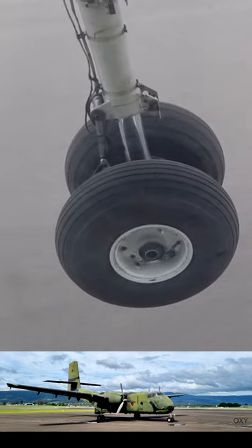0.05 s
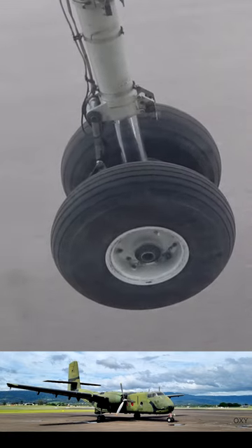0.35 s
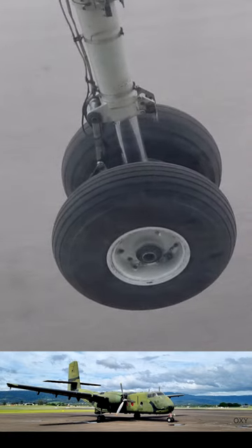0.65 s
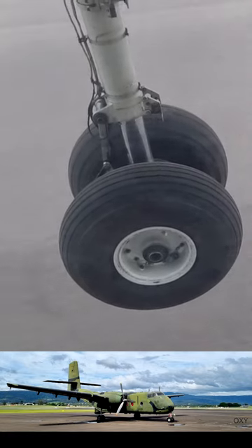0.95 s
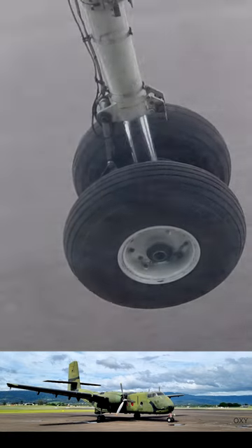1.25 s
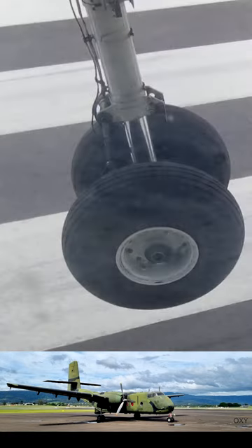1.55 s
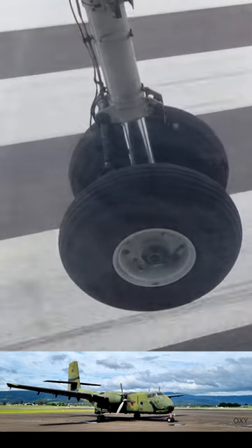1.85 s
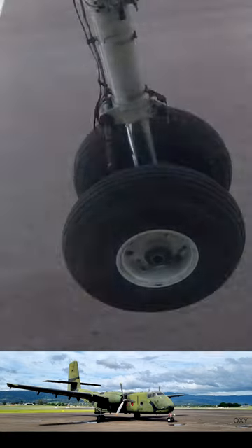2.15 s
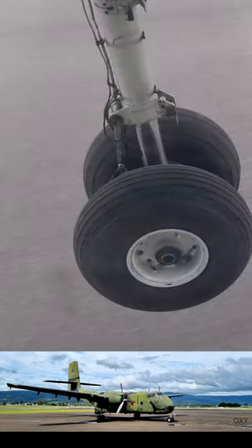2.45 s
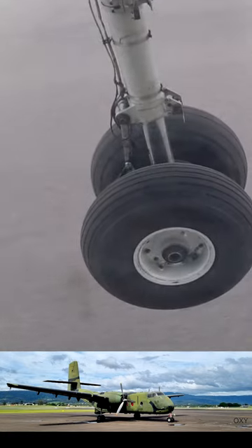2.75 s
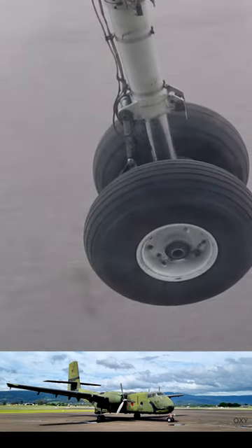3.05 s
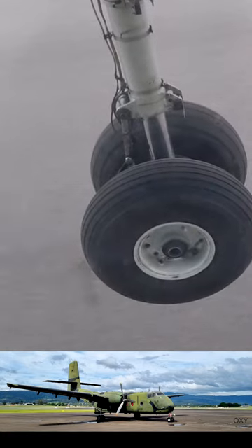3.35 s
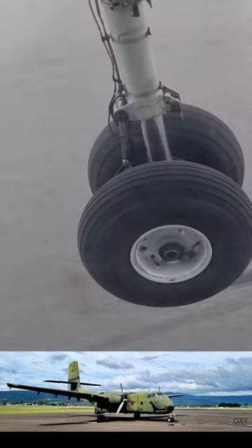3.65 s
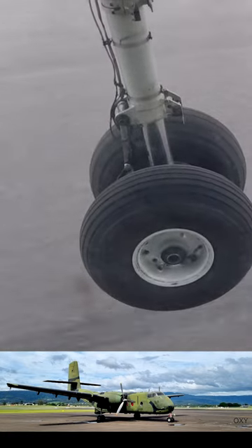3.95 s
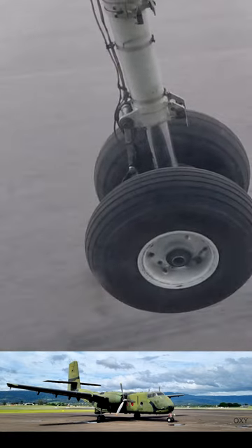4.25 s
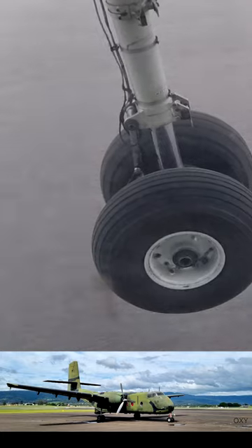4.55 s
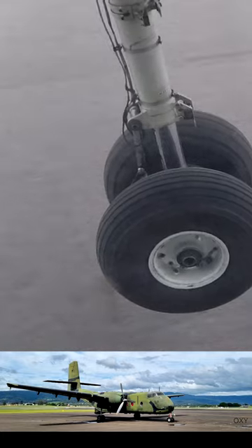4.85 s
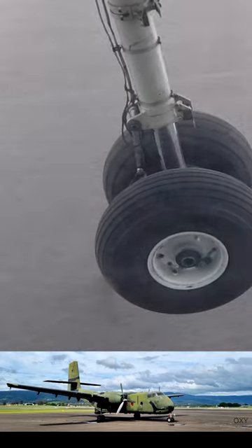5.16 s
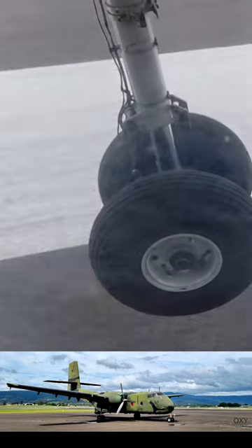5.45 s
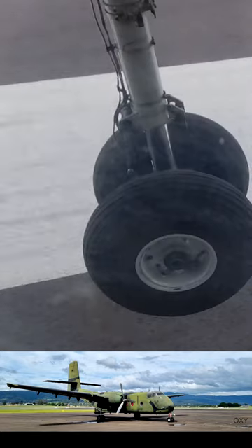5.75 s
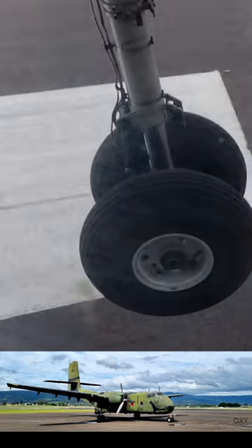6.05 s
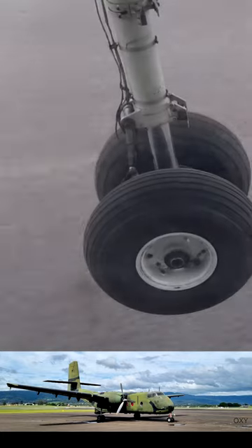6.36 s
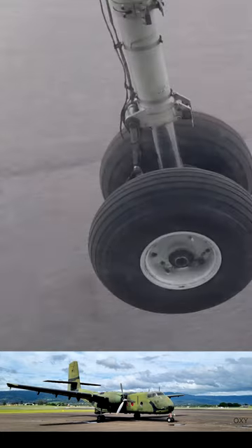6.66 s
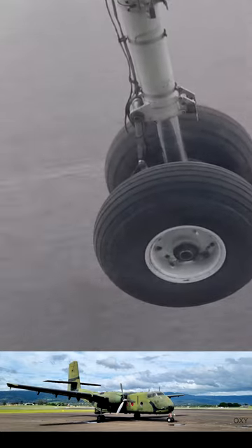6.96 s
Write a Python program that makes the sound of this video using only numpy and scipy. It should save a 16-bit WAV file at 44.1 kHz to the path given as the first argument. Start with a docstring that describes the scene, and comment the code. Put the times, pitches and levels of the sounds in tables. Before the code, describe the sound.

Inside a landing propeller plane, a low piston engine hum winds down and burbles while airflow roars and hisses past the window.

```python
"""Cabin of a piston transport aircraft, gliding over the runway just before touchdown.
The radial engine and three-bladed propeller wind down; their harmonics throb, then even out to a drone.
Propeller wash rumbles on the hull; the slipstream roars, hisses and whistles at the window.
The exhaust burbles as the throttle closes, and panels sing as high harmonics glide through them."""
import sys
import numpy as np
from scipy import signal
from scipy.fft import rfft, irfft, next_fast_len
from scipy.io import wavfile
from scipy.ndimage import map_coordinates

SR = 44100
rng = np.random.default_rng(int(sys.argv[2]) if len(sys.argv) > 2 else 0)


def put_to_file(sound):
    """Save the sound as 16-bit audio at rate SR, in the file named by the first command-line argument."""
    columns = np.atleast_2d(sound).T  # one column per channel
    safe = np.clip(columns, -1, 1)
    whole_steps = np.round(safe * 32767)
    wavfile.write(sys.argv[1], SR, whole_steps.astype(np.int16))


N = 309141

# working-cycle rate (1 cycle = 2 crank turns = 1 propeller turn): t/s, f/Hz
CYCLE_RATE = [(0.0, 17.146), (0.92, 17.11), (1.7, 16.369), (2.55, 15.623), (3.6, 15.118), (5.38, 14.544),
              (6.0, 13.628), (7.0, 12.559)]
# spread of each cycle's thump: t/s, smear (0 = throb, 1 = even drone)
THUMP_SMEAR = [(0, .65), (.8, .65), (1.6, .25), (2.3, .25), (2.9, .95), (7, 1)]
# leading tones, blade order 6 and exhaust order 10: t/s, level/dB
BLADE_LEVEL = [(0, -22.5), (1.15, -14), (1.8, -17.5), (2.4, -24.5), (3.15, -21), (3.9, -24.5), (4.5, -18.5),
               (5.3, -21), (6.1, -29.5), (7, -23.5)]
EXHAUST_LEVEL = [(0, -19), (1.7, -23), (2.1, -32), (2.6, -21.5), (3.3, -22), (4.1, -27), (4.6, -29),
                 (5.7, -37), (7, -43)]
# other harmonics at 15 Hz (multiples of 3: blades, rest: exhaust): order, level/dB
DRONE_ORDERS = [(3, -34.5), (4, -31.5), (5, -26.3), (7, -45), (9, -37.5), (11, -42.5), (12, -37.5),
                (13, -45), (14, -39), (15, -47.5), (17, -41), (18, -41), (20, -46), (21, -43), (22, -46.5),
                (23, -44), (24, -43), (27, -44)]
# cabin standing waves: f/Hz, width/Hz, peak or dip/dB
CABIN_MODES = [(41, 35, 9.5), (41.7, 2.4, 6), (47.3, 1.2, 7), (49, 1.3, -9), (72.45, 2.2, 5.5),
               (76.4, 8, 5.5), (83.5, 4.5, -15.5), (88.7, 4.7, 6), (97, 9.5, 7.5), (138, 6.6, 5.5),
               (154.8, 6.5, 8.5), (162.6, 4.6, 8.5), (172.9, 14.8, 12.5), (269, 7.7, 8), (322.1, 14, 13.5)]
# airflow along the hull: t/s, level/dB
FLOW_LEVEL = [(0, 1), (.72, 0.7), (1.05, -1.7), (1.7, -2), (2.35, 0.3), (3.0, 0.1), (3.9, 1.4), (5.6, -0.5),
              (7, 2.5)]
# air noise spectra, relative density: f/Hz, level/dB
WASH_SPECTRUM = [(18, -15), (30, 1.5), (70, 1), (125, -2), (190, 1.5), (225, -1.5), (320, -0.5), (390, -5),
                 (470, -11.5), (650, -26.5), (1500, -58)]
ROAR_MID_SPECTRUM = [(200, -15), (450, 7), (560, 5), (700, 3), (850, 1), (1050, -3.5), (1250, -5),
                     (1500, -13), (2000, -14.5), (4000, -32.5)]
ROAR_SIDE_SPECTRUM = [(50, 8), (100, -2.5), (230, -9.5), (390, -5), (520, 1.5), (610, -2.5), (800, -3.5),
                      (1050, -9), (1270, -7.5), (1470, -17.5), (1650, -15), (1950, -20), (2300, -20),
                      (4000, -27)]
HISS_LEFT_SPECTRUM = [(800, 7), (1900, -1), (2700, 4.5), (3100, 1), (3600, 0.5), (5200, -1), (6400, 0.5),
                      (8400, 1.5), (10300, -2.5), (13500, -1.5), (15700, -3)]
HISS_RIGHT_SPECTRUM = [(800, 12), (1900, 5.5), (2700, 8), (4000, 6.5), (5800, 5), (9000, 0), (10200, -3.5),
                       (11200, -8), (12600, 2.5), (13700, 1.5), (15700, -5)]
WHISTLE_SPECTRUM = [(1900, -39), (2490, -5), (2600, 1), (2710, -3), (2850, -5), (3200, -9.5), (4000, -27),
                    (4700, -6.5), (5700, -26), (6300, -9), (7200, -37)]
# top band of the hiss, relative: t/s, level/dB
TOP_HISS_LEVEL = [(0, -38), (.7, -38), (1.2, -40.5), (4.4, -40), (5.7, -43.5), (7, -43)]
# exhaust thump spectrum, relative density: f/Hz, level/dB
BURBLE_SPECTRUM = [(15, -28), (28, -27), (42, 2), (70, -4.5), (92, 4.5), (115, -3), (170, -8), (220, -17),
                   (310, -9), (400, -30), (600, -76)]
# panel resonances: f/Hz, width/Hz, level/dB
PANEL_MODES = [(470, 40, -44), (600, 60, -50), (828, 40, -40), (960, 40, -48), (1060, 50, -50),
               (1180, 36, -49)]
# engine's drive on the panels: t/s, level/dB
SHAKE_LEVEL = [(0, -26), (1.8, -12), (2.9, -4.5), (3.2, 3), (3.5, 0.5), (3.78, 5.5), (4.95, -1.5),
               (5.3, -0.5), (5.75, -6), (7, -3)]


def undb(db):
    return 10 ** (np.asarray(db) / 20)


def curve(table):
    """Time table, linearly interpolated per sample."""
    t_s, values = np.transpose(table)
    return np.interp(np.arange(N) / SR, t_s, values)


def walk(rate_hz):
    """Smooth random drift, spread near 1."""
    knots = rng.standard_normal(int(rate_hz * N / SR) + 4)
    grid = np.arange(0, N + 64, 64)
    spline = map_coordinates(knots, [1 + grid * rate_hz / SR], order=3, mode="nearest")
    return np.interp(np.arange(N), grid, spline)


def colour(x, spectrum):
    """Shape x to a spectrum, rolled off past its ends; rms 1."""
    f_hz, level_db = np.transpose(spectrum)
    size = next_fast_len(N)
    bins_hz = np.maximum(np.arange(size // 2 + 1) * SR / size, 1)
    gain = undb(np.interp(np.log(bins_hz), np.log(f_hz), level_db))
    skirts = np.minimum(bins_hz / f_hz[0], 1) ** 2 * np.minimum(f_hz[-1] / bins_hz, 1) ** 2
    shaped = irfft(rfft(x, size) * gain * skirts, size)[:N]
    return shaped / np.std(shaped)


def noise(spectrum):
    return colour(rng.standard_normal(N), spectrum)


def resonance(f_hz, centre_hz, width_hz):
    """Bell curve, peak 1."""
    return 1 / (1 + (2 * (f_hz - centre_hz) / width_hz) ** 2)


def standing_waves_db(f_hz, hop=100):
    """Cabin boost or cut of a gliding tone."""
    gain_db = sum(db * resonance(f_hz[::hop], hz, width_hz) for hz, width_hz, db in CABIN_MODES)
    return np.interp(np.arange(N), np.arange(0, N, hop), gain_db)


def harmonic(prop_rad, order, smear, waver_db=.5):
    """One tone, rms near 1. Smear drifts its phase and offsets the order above each blade harmonic."""
    offset_rad = np.pi * (order % 3 == 1) + .05 * order * walk(.7)
    return np.sqrt(2) * undb(waver_db * walk(2.5)) * np.sin(order * prop_rad + smear * offset_rad)


def engine_drone(prop_rad, cycle_hz):
    """Blade and exhaust harmonics align once a cycle in a throb; smear evens it out."""
    reference_hz, db_per_octave = 15, 13.5
    effort_db = db_per_octave * np.log2(cycle_hz / reference_hz)
    smear = curve(THUMP_SMEAR)
    drone = undb(curve(BLADE_LEVEL)) * harmonic(prop_rad, 6, smear)
    drone += undb(curve(EXHAUST_LEVEL)) * harmonic(prop_rad, 10, smear)
    for order, level_db in DRONE_ORDERS:
        if order in (3, 4, 5, 7, 9, 12):
            tone = harmonic(prop_rad, order, smear)
        else:  # upper orders bounce round the cabin, never align
            tone = harmonic(prop_rad, order, smear=1.7, waver_db=1.5)
        drone += undb(level_db + effort_db + standing_waves_db(order * cycle_hz)) * tone
    return drone


def propeller_wash(prop_rad, flow_db):
    """Wash rumbles on the hull, pulsing per blade and per turn."""
    pulse = 1 + .2 * np.cos(3 * prop_rad) + .2 * np.cos(prop_rad)
    return noise(WASH_SPECTRUM) * pulse * undb(-21.5 + .96 * flow_db)


def slipstream_roar(flow_db):
    """Air roars past; near the glass, left and right are mostly in antiphase."""
    mid = noise(ROAR_MID_SPECTRUM) * undb(-33 + flow_db + .5 * walk(7))
    side = noise(ROAR_SIDE_SPECTRUM) * undb(-26.5 + flow_db + .5 * walk(6.3))
    return np.array([mid + undb(1.2) * side, mid - side])


def slipstream_hiss(flow_db, split_hz=6200):
    """Air hisses along the window, louder on the right; the lower band follows the flow."""
    hiss = np.array([noise(HISS_LEFT_SPECTRUM) * undb(-.9), noise(HISS_RIGHT_SPECTRUM) * undb(5)])
    top = signal.sosfiltfilt(signal.butter(2, split_hz, "high", fs=SR, output="sos"), hiss)
    return (hiss - top) * undb(-38 + .81 * flow_db) + top * undb(curve(TOP_HISS_LEVEL) + 5)


def window_whistle(flow_db, rise_db_per_s=.5):
    """A window gap whistles breathily, slowly growing."""
    rise_db = rise_db_per_s * np.arange(N) / SR
    return noise(WHISTLE_SPECTRUM) * undb(-48.5 + .8 * flow_db + rise_db + 1.3 * walk(6))


def exhaust_burble(prop_rad, cycle_hz, cylinders=14):
    """Cylinders fire in turn at random strength; burning grows uneven towards idle."""
    power_db, idle_db = -35, -19
    onset_hz, spread_hz = 15.27, .9
    firings = np.diff(np.floor(cylinders * prop_rad / (2 * np.pi)), prepend=0)
    thumps = colour(firings * rng.standard_normal(N), BURBLE_SPECTRUM)
    idling = 1 / (1 + np.exp((cycle_hz - onset_hz) / spread_hz))
    return thumps * undb(power_db + (idle_db - power_db) * idling)


def singing_panels(prop_rad, cycle_hz, jitter_rad=.0088, exhaust_db=-13, hop=100):
    """High harmonics sing while crossing panel resonances; shaft jitter roughens them."""
    shaft_rad = prop_rad + jitter_rad * walk(16)
    song = np.zeros(N)
    for order in range(28, 86):
        f_hz = order * cycle_hz[::hop]
        gain = sum(undb(db) * resonance(f_hz, hz, width_hz) for hz, width_hz, db in PANEL_MODES)
        if order % 3:
            gain *= undb(exhaust_db)
        tone = np.sqrt(2) * np.cos(order * shaft_rad + 2 * np.pi * rng.random())
        song += np.repeat(gain, hop)[:N] * tone
    flutter_db = .8 * walk(5)
    return song * undb(curve(SHAKE_LEVEL) + flutter_db)


def scene():
    """Stereo mix: one shaft angle drives the engine sounds, one flow curve the air."""
    cycle_hz, flow_db = curve(CYCLE_RATE), curve(FLOW_LEVEL)
    prop_rad = 2 * np.pi * np.cumsum(cycle_hz) / SR - 1.9
    engine = engine_drone(prop_rad, cycle_hz) + exhaust_burble(prop_rad, cycle_hz)
    right_delay_s = .00022
    engine_late = np.interp(np.arange(N) - right_delay_s * SR, np.arange(N), engine)
    panels = singing_panels(prop_rad, cycle_hz)
    left = undb(1) * engine + undb(2) * panels
    right = undb(1.36) * engine_late + undb(-2) * panels
    air = propeller_wash(prop_rad, flow_db) + slipstream_roar(flow_db)
    air += slipstream_hiss(flow_db) + window_whistle(flow_db)
    return np.array([left, right]) + air


def record(dry, ceiling=.98, cutoff_hz=15600):
    """Soft peak limit, brief end fades, steep low-pass."""
    limited = dry / (1 + (np.abs(dry) / ceiling) ** 8) ** (1 / 8)
    fade = signal.windows.tukey(N, .001)
    return signal.sosfilt(signal.ellip(12, .1, 90, cutoff_hz, fs=SR, output="sos"), fade * limited)


dry = scene()
out = record(dry)
put_to_file(out)
```